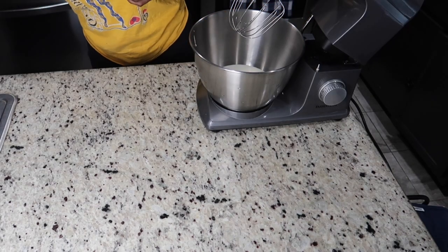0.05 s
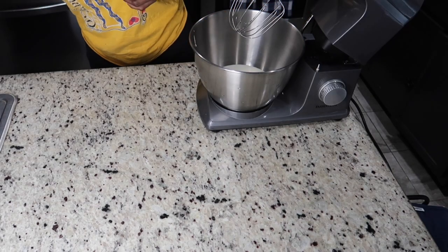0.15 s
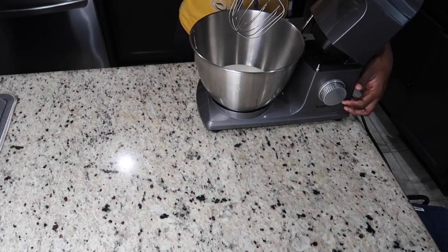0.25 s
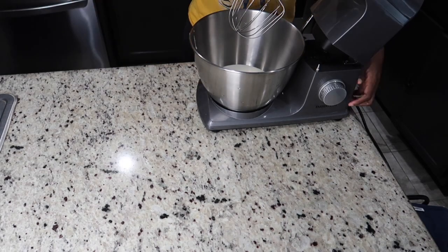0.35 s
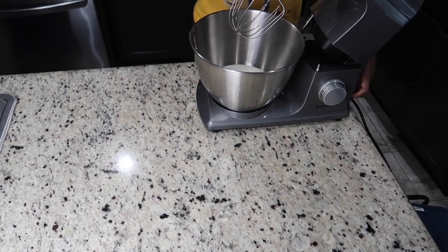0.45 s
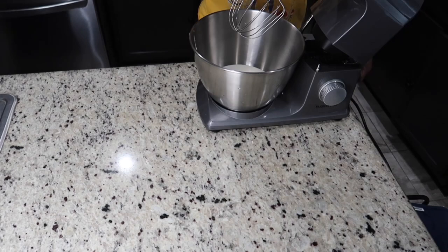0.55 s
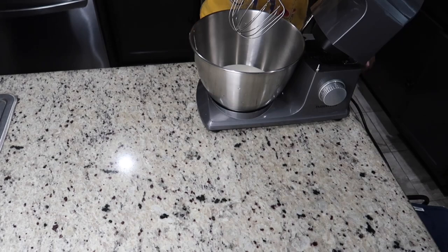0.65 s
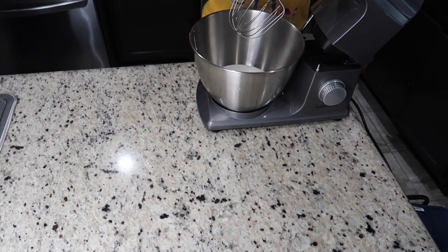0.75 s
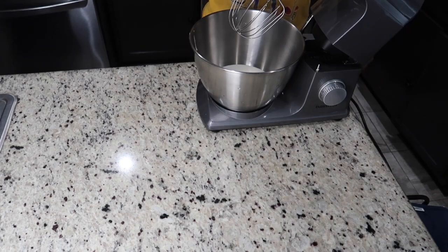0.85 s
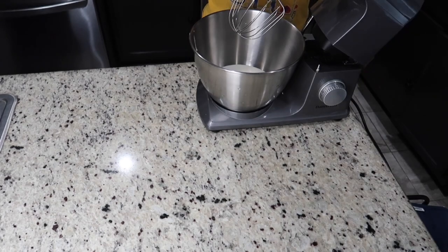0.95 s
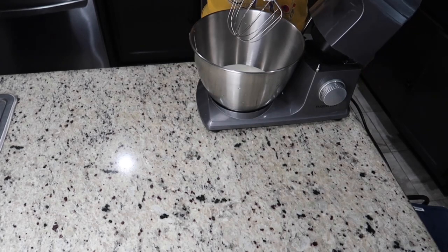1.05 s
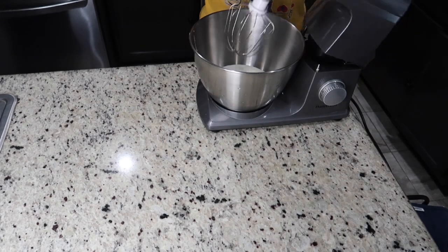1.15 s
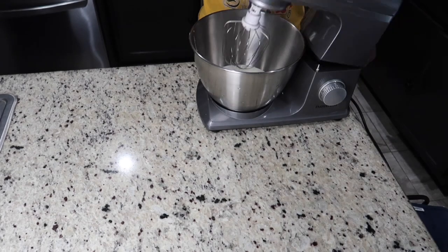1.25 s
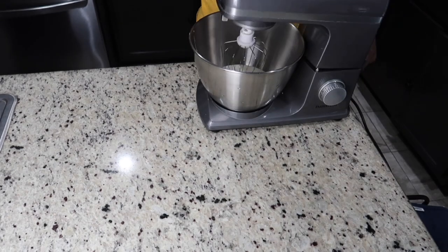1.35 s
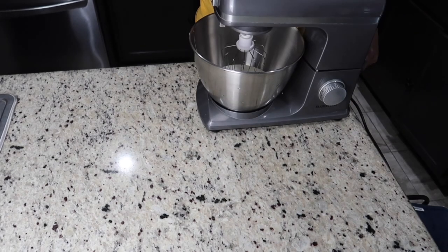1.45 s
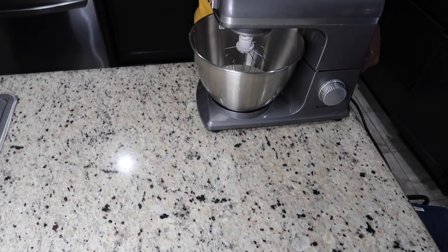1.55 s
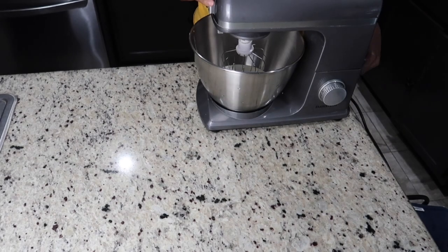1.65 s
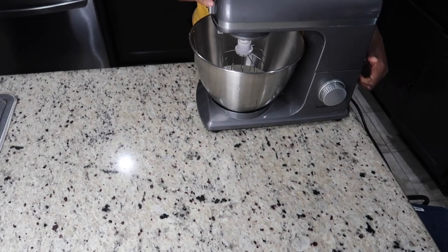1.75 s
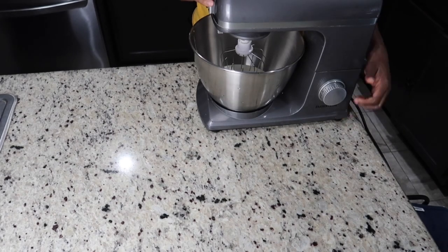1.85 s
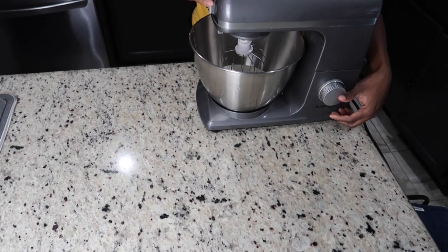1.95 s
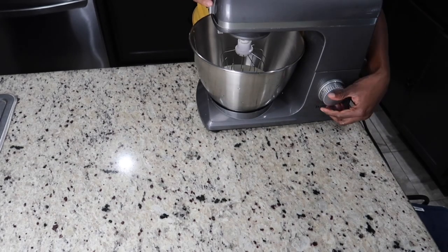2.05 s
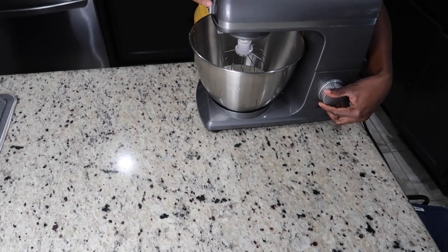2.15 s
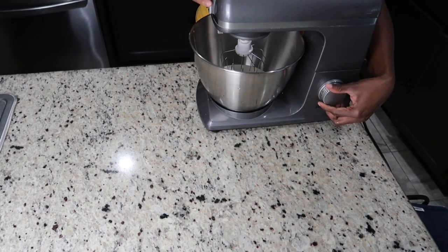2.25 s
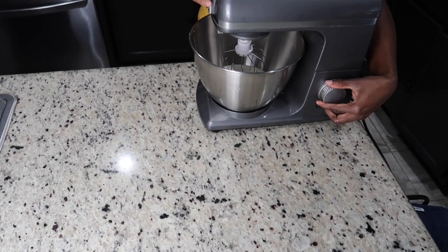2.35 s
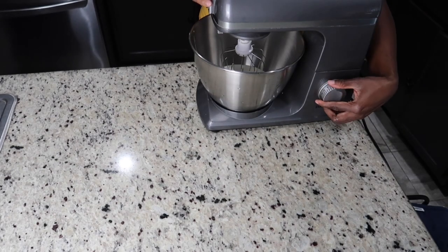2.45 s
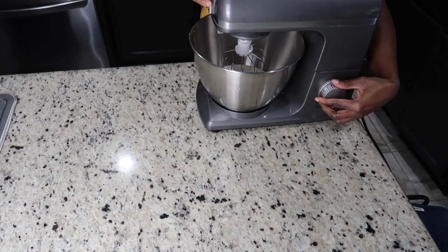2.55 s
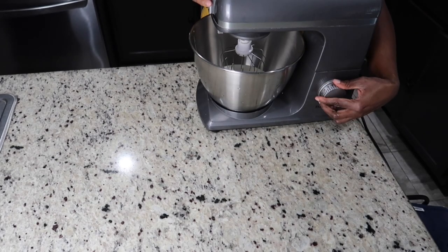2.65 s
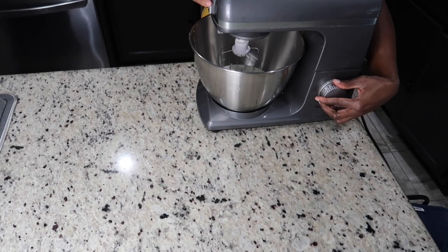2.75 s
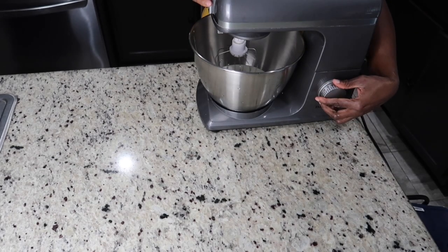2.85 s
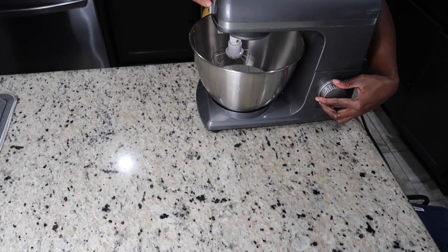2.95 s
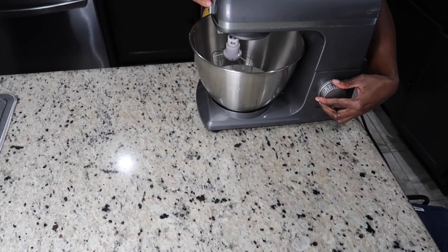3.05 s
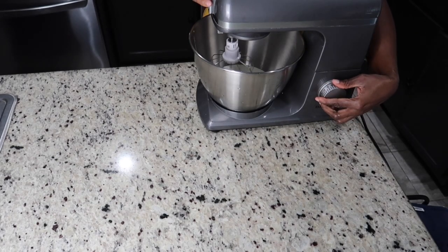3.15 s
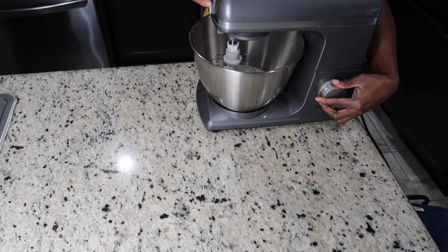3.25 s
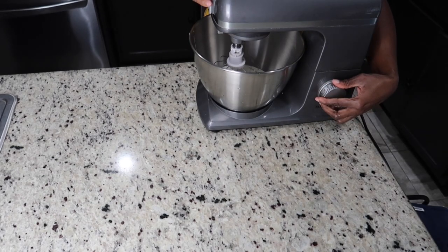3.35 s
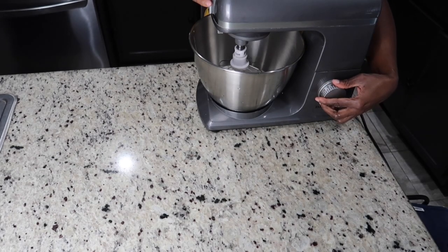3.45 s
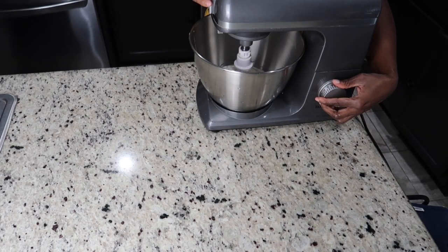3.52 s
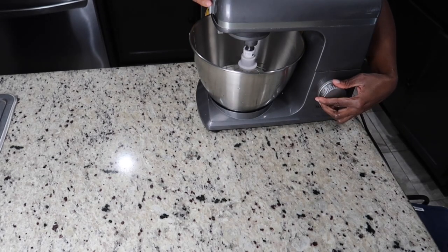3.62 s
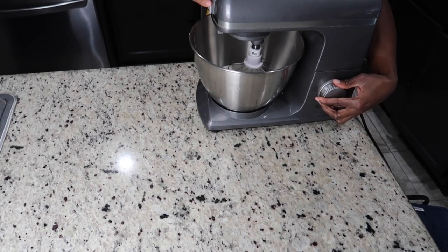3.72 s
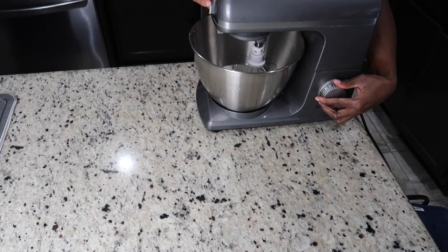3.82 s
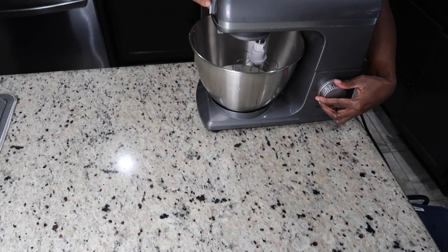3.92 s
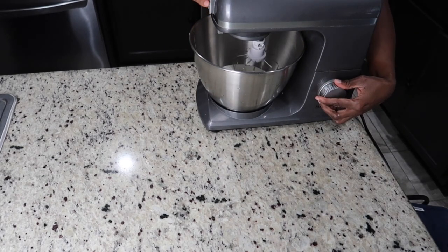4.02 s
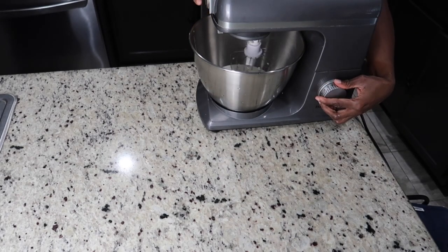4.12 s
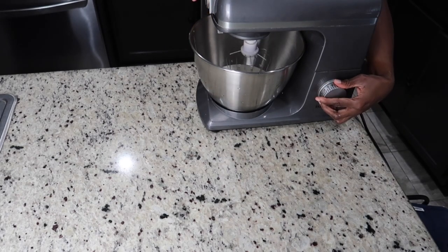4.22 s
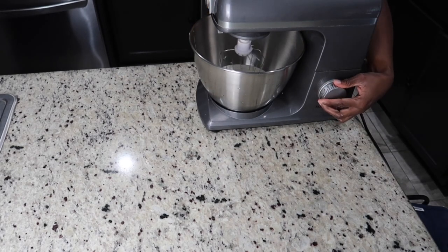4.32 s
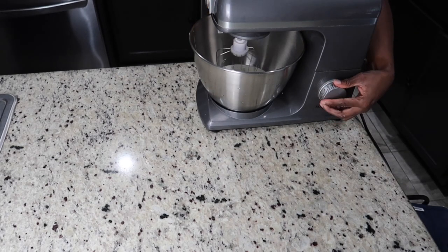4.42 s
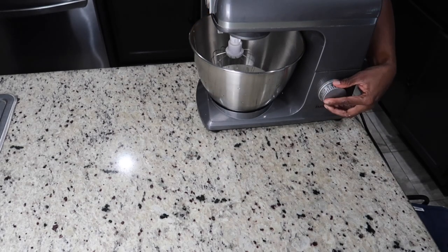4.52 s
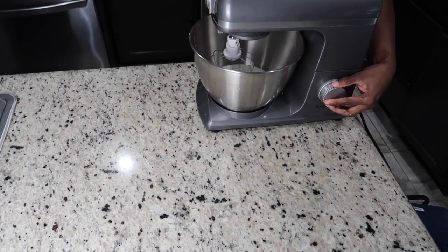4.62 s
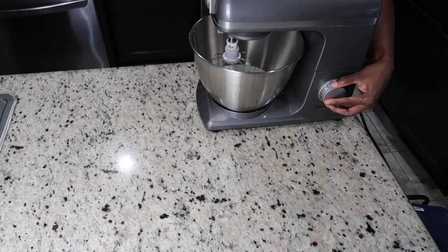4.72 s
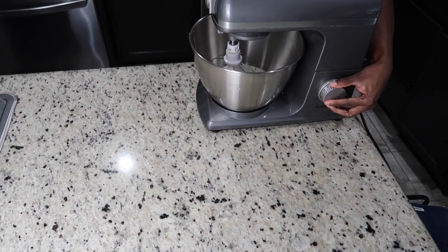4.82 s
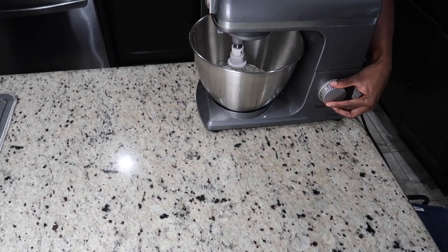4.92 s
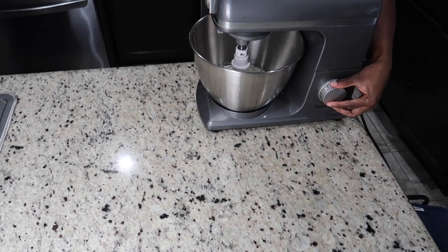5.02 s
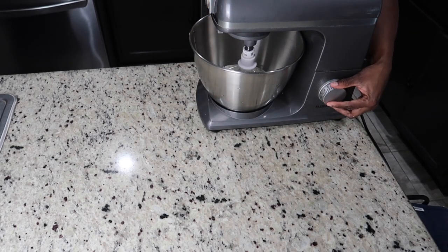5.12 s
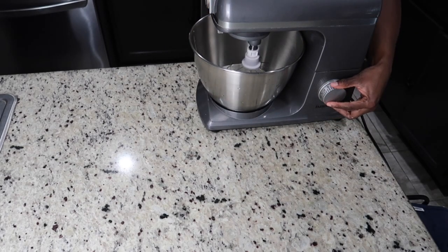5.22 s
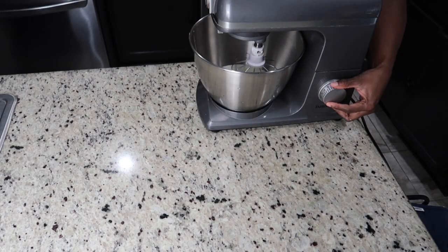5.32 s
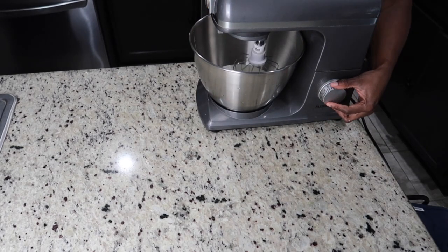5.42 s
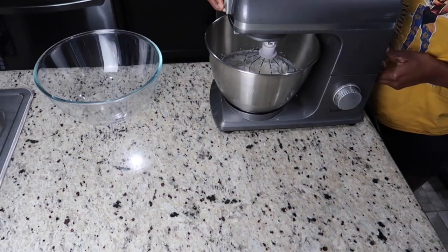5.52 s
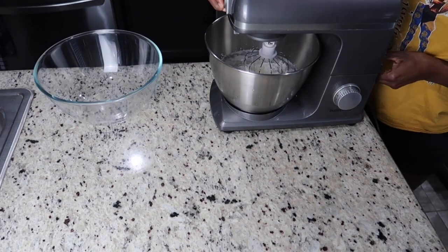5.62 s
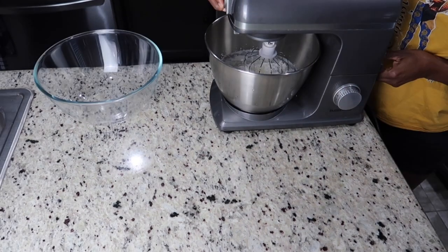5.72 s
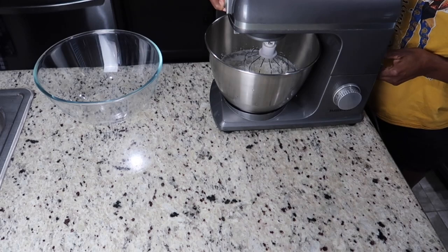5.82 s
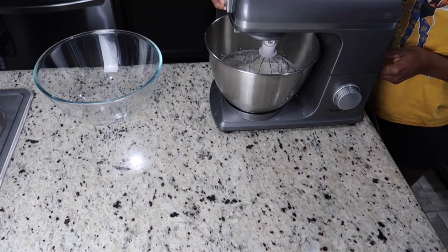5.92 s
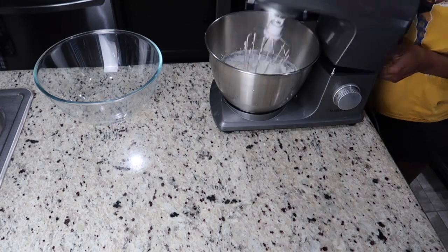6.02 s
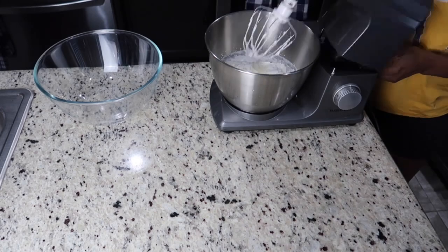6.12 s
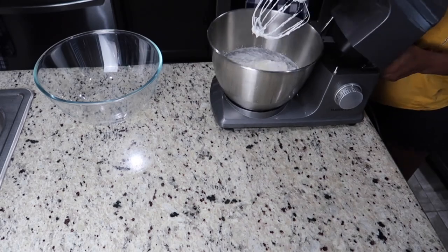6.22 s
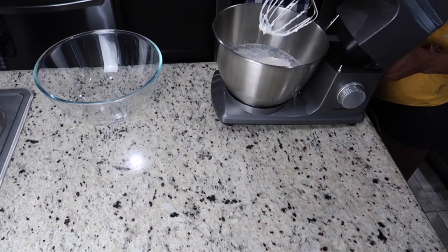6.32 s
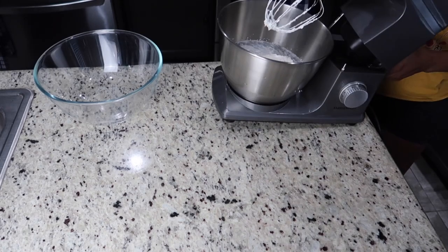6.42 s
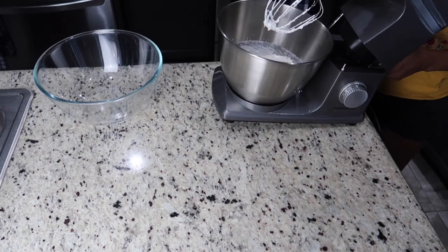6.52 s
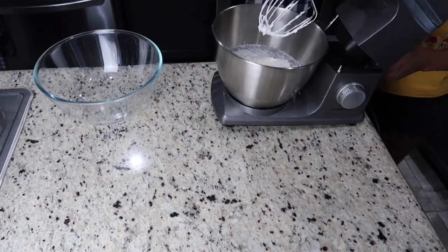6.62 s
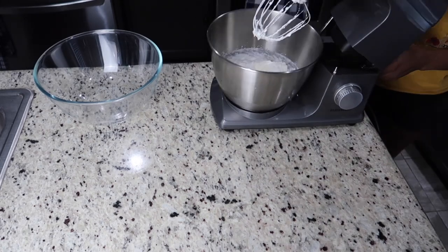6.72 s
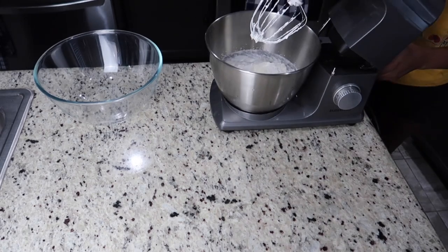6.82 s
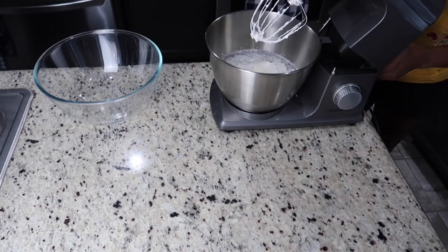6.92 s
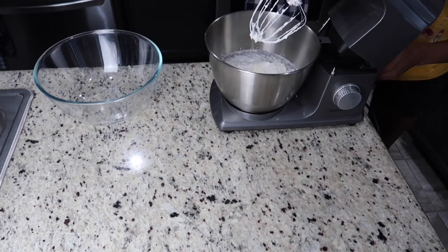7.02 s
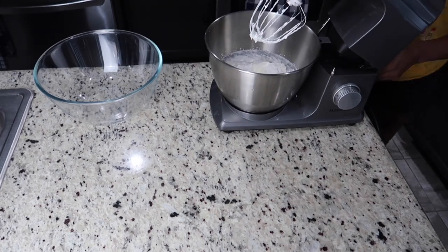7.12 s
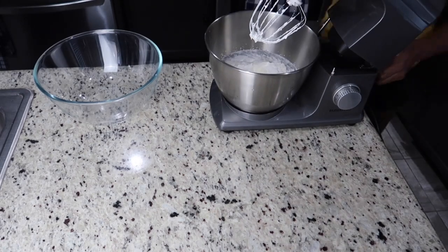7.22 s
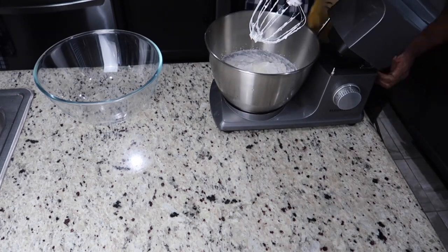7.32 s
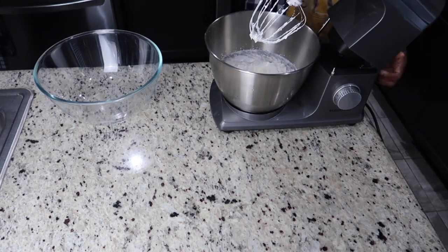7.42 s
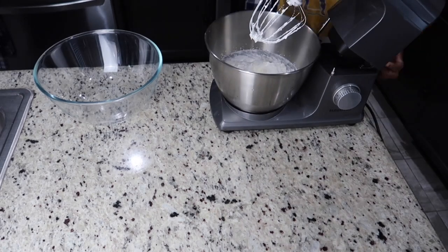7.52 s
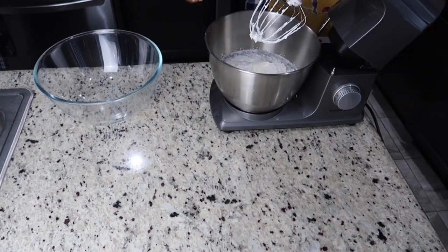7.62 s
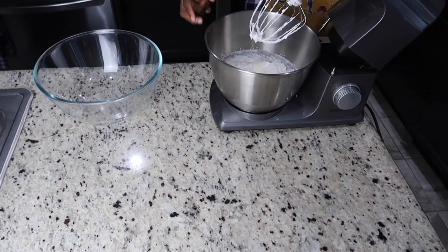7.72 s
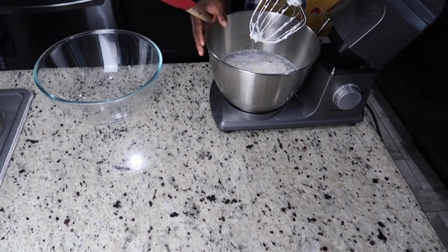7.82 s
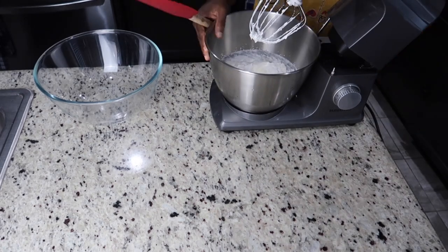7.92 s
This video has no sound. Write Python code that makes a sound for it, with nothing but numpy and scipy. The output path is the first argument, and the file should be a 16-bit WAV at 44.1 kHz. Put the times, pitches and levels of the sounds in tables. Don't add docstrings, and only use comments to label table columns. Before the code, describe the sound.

A close stereo pickup in a hard kitchen, with low appliance rumble and faint hiss. At 0.23 s a dull thud on stone, then a brief dip to silence at a scene change. A bright latch knock at 0.7 and very sharp steel clack at 0.98 ring briefly. Cloth and hands rub; from 1.2 the head swings down with a faint scrape and tiny squeal, a dull clack at 1.38, and a heavy landing at 1.72. A dial clicks at 2.5. From 2.64 the motor whirs up over about half a second, then holds a midrange gear whine with hum, brush noise and rattle, wavering slightly. It cuts off at 5.55. Latch clicks at 5.7, a hard knock at 5.95, a quick rising spring scrape at 6.13, a bang at 6.26, and a last ringing knock at 6.81. Light ticks and soft rubbing continue to 8.

```python
import sys
import numpy as np
from scipy import signal
from scipy.fft import rfft, irfft
from scipy.io import wavfile
from scipy.ndimage import uniform_filter1d

SR = 44100
rng = np.random.default_rng(int(sys.argv[2]) if len(sys.argv) > 2 else 0)


def ratio(d):
    e = np.asarray(d, float) / 20
    return 10 ** e


def materialize(psi):
    bounded = np.clip(np.atleast_2d(psi).T, -1, 1)
    quanta = np.round(bounded * 32767).astype(np.int16)
    wavfile.write(sys.argv[1], SR, quanta)


N = 351036
T = np.arange(N) / SR


def evened(x):
    return x / np.sqrt(np.mean(x ** 2) + 1e-20)


def read(points, hz):
    f, value = np.transpose(points)
    return np.interp(np.log(hz + 1), np.log(f + 1), value)


def peaked(hz, peaks):
    return sum(top / (1 + (2 * (hz - f) / width) ** 2) for f, width, top in peaks)


def drift(hz):
    return evened(signal.lfilter(*signal.butter(2, hz, fs=SR), rng.standard_normal(N)))


def band(x, lo_hz, hi_hz):
    return signal.sosfilt(signal.butter(2, [lo_hz, hi_hz], "band", fs=SR, output="sos"), x)


def resonate(x, hz, width):
    turn = np.exp(2j * np.pi * np.cumsum(hz * np.ones(len(x))) / SR)
    r = np.exp(-np.pi * width / SR)
    return 2 * (turn * signal.lfilter([1 - r], [1, -r], x / turn)).real


def noise(spectrum, peaks=(), patchy_db=1.5):
    hz = np.fft.rfftfreq(2048, 1 / SR)
    a, b, patches = rng.standard_normal((N // 512 + 5, 1025, 3)).T
    patches = uniform_filter1d(patches, size=12, axis=0)
    patches = evened(uniform_filter1d(patches, size=6, axis=1))
    db = read(spectrum, hz) + peaked(hz, peaks)
    frames = (a + 1j * b) * ratio(db[:, None] + patchy_db * patches)
    return evened(signal.istft(frames, nperseg=2048, noverlap=1536)[1][:N])


def contact(ms, spray):
    t = np.arange(len(spray)) / SR
    return spray * (1 - np.exp(-t / 0.0012)) * np.exp(-(1000 * t / ms) ** 1.35)


# frequency in Hz, level in dB per Hz.
RUMBLE = [(12, -32.5), (20, -2.5), (48, -16.5), (68, -31), (88, 9.5), (113, -1), (146, -9.5), (220, -11),
          (290, -42), (480, -120)]
HISS = [(88, -40), (150, -21.5), (274, -7.5), (308, -11), (346, -10.5), (453, -13.5), (500, -18),
        (751, -21.5), (10900, -48), (15500, -56.5)]


def air():
    duck_db, recover_s = 7.5, 0.68
    sunk = sum(ratio(db / 2) * np.exp(-abs(T - s) / recover_s) * np.clip((T - s) / 0.11, 0, 1)
               for s, db, *_ in KNOCKS)
    rumble = ratio(-44.5) * noise(RUMBLE, patchy_db=0.6)
    hiss = ratio(-51.5) * noise(HISS, patchy_db=2.0)
    return ratio(-duck_db * sunk) * (rumble + hiss)


# frequency in Hz, level in dB, t60 in seconds.
THUD_MODES = [(150, -5, 0.24), (216, 7.5, 0.066), (298, -1, 0.12), (378, -12, 0.24), (573, -8, 0.11),
              (930, -4.5, 0.031), (1400, -12, 0.045), (1800, -10.5, 0.054)]
# start in seconds, peak in dB.
THUD = [
    (.2302, -16.5),
]


def set_down():
    (s, peak_db), = THUD
    t = np.maximum(T - s, 0)
    rings = sum(ratio(db - 60 * t / t60) * np.sin(2 * np.pi * hz * t) for hz, db, t60 in THUD_MODES)
    rings *= 1 - np.exp(-t / 0.0013)
    return -ratio(peak_db) * rings / abs(rings).max()


# start in seconds, peak in dB, frequency in Hz, t60 in seconds.
THUMPS = [
    (.231, -18.5, 162, 0.11),
    (1.72, -22.5, 198, 0.15),
    (1.72, -28.5, 80.6, 0.28),
    (5.707, -38.5, 208, 0.14),
    (5.953, -26.5, 81, 0.31),
    (6.26, -22, 145, 0.2),
    (6.261, -32.5, 79, 0.22),
    (6.262, -18, 380, 0.093),
    (6.802, -16.5, 75, 0.064),
    (6.811, -22.5, 150, 0.18),
]
# start in seconds, peak in dB, frequency in Hz, t60 in seconds.
RINGS = [(0.7, -16, 1270, 0.094), (.7, -31.5, 1300, 0.52), (.698, -23, 3650, 0.13),
         (0.698, -23, 4550, 0.14), (0.698, -27.5, 5460, 0.2), (.99, -22, 1200, 0.06),
         (.982, -11, 2300, .03), (.987, -12.5, 2000, .03), (.9875, -9, 3500, 0.02),
         (.985, -10.5, 4930, 0.02), (.99, -34, 303, .4), (.99, -34, 490, 0.33), (2.12, -55, 3550, 0.027),
         (6.262, -22, 301, 0.24), (6.639, -43, 1400, 0.027), (6.815, -20, 1680, .08),
         (1.382, -16, 1400, 0.024), (1.385, -34, 1137, 0.26), (1.384, -19.5, 3700, 0.026),
         (1.384, -24.5, 3950, .05), (1.722, -14.5, 301, 0.16), (1.72, -25, 490, 0.3),
         (1.72, -20.5, 580, 0.073), (1.722, -29, 1100, .12), (1.7175, -6.5, 2000, 0.025),
         (1.72, -13.5, 2654, 0.05), (1.716, -34.5, 5460, 0.098), (2.507, -32.5, 3050, 0.026),
         (5.707, -32, 2600, 0.045), (5.707, -40, 4500, 0.074), (5.957, -20.5, 1100, 0.18),
         (5.957, -32, 5500, 0.14), (6.814, -6.5, 3870, 0.021), (6.815, -24.5, 4113, 0.14),
         (6.815, -26.5, 3246, .15), (6.814, -28, 1077, 0.3), (6.815, -20.5, 1400, 0.12),
         (5.956, -14, 2250, 0.037)]
# frequency in Hz, level in dB, t60 in seconds.
LATCH = [(7860, -5, 0.16), (9400, -8, 0.1), (10060, -2, 0.064), (10910, -13.5, 0.66), (11210, -28, 5.0),
         (11520, -29, 0.083), (12200, -12.5, .12), (12800, -11, 0.14), (14640, -14, .1)]
# start in seconds, level in dB.
LATCH_HITS = [
    (.697, -43.5),
    (5.707, -41.5),
    (5.78, -50),
    (5.958, -43.5),
]


def ringing():
    out = np.zeros(N)
    t = T[:SR // 2]
    chatter = drift(160)
    latch = [(s, hit + db, hz, min(t60, .15)) for s, hit in LATCH_HITS for hz, db, t60 in LATCH]
    for s, db, hz, t60 in THUMPS + RINGS + latch:
        start = round(s * SR)
        pair = np.sin(2 * np.pi * hz * t) + 0.38 * np.sin(2 * np.pi * 1.1 * hz * t)
        flutter_db = 3.5 * min(hz / 2500, 1) * chatter[start:][:len(t)]
        rise = 1 - np.exp(-t * hz / 0.22)
        out[start:][:len(t)] += ratio(db - 60 * t / t60 + flutter_db) * pair * rise
    return out


# start in seconds, peak in dB, body in dB, bright in dB, contact in ms.
KNOCKS = [
    (0.6961, -11, -21.5, 0, 13),
    (0.9814, -6, -24.5, -8.5, 4.8),
    (0.9853, -7.5, -22, -2, 4.2),
    (1.3816, -17, -14.5, -10, 3.4),
    (1.7174, -6.5, -13, -12, 6.3),
    (5.9545, -8, -14, -4.5, 8.3),
    (6.2585, -8, -17, -8.5, 3.5),
    (6.286, -17, -9, -10, 12),
    (6.813, -6.5, -24, -5, 4.9),
    (7.355, -56, 9, -17.5, 7.2),
]
# start in seconds, peak in dB, body in dB, bright in dB, contact in ms.
TOUCHES = [(.231, -42, 4, -8.5, 28), (0.68, -42.5, -16.5, -8, 4.5), (0.958, -43.5, -2.5, -4, 2.3),
           (1.682, -54.5, 8.5, -18, 24), (1.697, -49, 8, -19.5, 18), (1.712, -15, -12, -20, 2.4),
           (1.728, -16, -5.5, -10, 4), (5.952, -24.5, 2.5, -10, 2.2), (6.263, -10, -9, -14, 29),
           (6.27, -13.5, -8.5, -8, 2.2), (6.297, -20, -11.5, -6, 3.3), (6.808, -30, 8, -3, 6.8)]
# start in seconds, peak in dB, ring in Hz, bright in dB, contact in ms.
TICKS = [(0.5109, -43.5, 1420, -11.5, 6), (0.845, -21.5, 2300, -11.5, 9), (0.8761, -35, 1350, -13.5, 4),
         (1.2752, -33, 1210, -2, 6.8), (1.541, -47, 3800, -4.5, 4), (1.5664, -34.5, 3720, -12.5, 5),
         (2.5054, -32.5, 3140, -49, 2.7), (2.655, -31, 2600, -11.5, 4), (5.603, -23, 1124, -7.5, 2.9),
         (5.7045, -18, 2314, -1.5, 9.8), (5.7784, -27.5, 2660, 0.5, 6.3), (6.1344, -12.5, 3710, -9, 4),
         (6.147, -17.5, 1350, -24, 8), (6.1735, -24.5, 2220, -15, 4), (6.181, -20.5, 2650, -19.5, 4),
         (6.2235, -18.5, 2200, -14, 4), (6.6394, -44, 1400, -14, 6), (6.688, -38, 1100, -7, 9),
         (7.0556, -38, 3620, -18, 9.3), (7.3077, -43.5, 1194, -10, 6), (7.452, -44.5, 1130, -2, 12),
         (7.9362, -40.5, 2050, -3, 21)]
# frequency in Hz, level in dB, t60 in seconds.
CASTING = [(220, -1.5, 0.043), (300.7, -1.5, 0.15), (490, 2, 0.17), (617.4, -3.5, 0.13), (836, -24, 0.3),
           (1077.5, 2, 0.19), (1310, -1.5, 0.054), (1800, -10.5, 0.042), (2077, -5.5, 0.045),
           (2620, -17.5, .03), (3640, -4, 0.044), (4490, 3, 0.0093), (4650, -7.5, .03), (5460, -6, 0.095)]
# frequency in Hz, width in Hz, height in dB.
COLOUR_PEAKS = [(1160, 65, 6), (2250, 430, 6.5), (3690, 760, 4.5), (4570, 6700, 6.5)]
# low edge in Hz, high edge in Hz.
RANGES_HZ = ((150, 400), (400, 900), (900, 3000), (3000, 6000), (6000, 11500))


def in_ranges(x):
    return [band(band(x, *edges), *edges) for edges in RANGES_HZ]


def blows():
    crack, spread = np.zeros((2, N + 4000))
    rows = [(s, db, (body - 9, body, 0, bright, bright - 15), 0, ms)
            for s, db, body, bright, ms in KNOCKS + TOUCHES]
    rows += [(s, db, (-35, -30, 0, bright, bright - 22), hz, max(ms, 4.5))
             for s, db, hz, bright, ms in TICKS]
    colour_db = peaked(np.fft.rfftfreq(4000, 1 / SR), COLOUR_PEAKS)
    sprays = rng.standard_normal((len(rows), 4000))
    sprays *= ratio(2.77 * rng.exponential(1, (len(rows), 4000)))
    sprays = irfft(rfft(sprays) * ratio(colour_db))
    click = np.roll(irfft(ratio(.5 * colour_db)), 60)[:400]
    clicks = in_ranges(np.pad(click, (0, 3600)))
    for (s, db, ranges_db, hz, ms), spray in zip(rows, sprays):
        start = round(s * SR)
        hit = contact(ms, spray)
        parts = in_ranges(hit)
        if hz:
            parts[2] = parts[2] + 1.1 * resonate(hit, hz, 260)
        parts = [ratio(db + d) * p / abs(p).max() for p, d in zip(parts, ranges_db)]
        crack[start:][:4000] += sum(parts)
        spread[start:][:4000] += sum(c * np.linalg.norm(p) / np.linalg.norm(c)
                                     for c, p in zip(clicks, parts))
    crack, spread = crack[:N], spread[:N]
    ring = sum(ratio(db) * np.sqrt(t60 / 0.032) * resonate(crack, hz, np.log(9) / t60)
               for hz, db, t60 in CASTING)
    ring *= ratio(3.5)
    return crack + ring, spread + 0.45 * ring


# top in seconds, top in dB, rise in seconds, fall in seconds, resonance in Hz.
SLIDES = [(.44, -57.5, .06, 0.085, 2100), (.54, -52, 0.046, .2, 1590), (.685, -50, 0.097, .015, 1900),
          (.87, -47.5, 0.026, 0.17, 1540), (.96, -52.5, .03, .02, 1672), (1.23, -43, .07, 0.3, 1715),
          (1.35, -47, .08, .06, 2105), (1.5, -52.5, 0.025, 0.082, 1350), (1.7, -56, 0.18, .02, 1553),
          (2.48, -59.5, .06, .06, 2140), (2.55, -52, .04, .1, 2397), (2.632, -49, 0.035, 0.046, 2390),
          (5.59, -54.5, 0.052, .02, 1497), (5.8, -44, 0.022, 0.02, 1937), (5.942, -50.5, 0.2, .015, 2250),
          (6.69, -48, 0.072, 0.28, 1714), (6.78, -69, .1, 0.017, 1800), (7.12, -60.5, 0.052, 0.81, 1595),
          (7.315, -53, 0.017, 0.11, 1800), (7.465, -50, 0.041, 0.1, 2030), (7.73, -52, 0.024, 0.18, 2023),
          (7.95, -43, 0.19, .1, 1800)]
# frequency in Hz, level in dB per Hz.
SLIDE = [(180, -37), (300, -1), (870, -6), (1340, -4), (2340, -8.5), (2990, -11.5), (4830, -17.5),
         (12000, -42), (15600, -73), (22000, -120)]


def strokes():
    shapes = np.array([ratio(db - 12.5 * np.maximum((s - T) / rise, (T - s) / fall)) + 1e-9
                       for s, db, rise, fall, hz in SLIDES])
    return shapes.max(axis=0), np.transpose(SLIDES)[4] @ shapes / shapes.sum(axis=0)


def slides():
    level, hz = strokes()
    rub = noise(SLIDE, COLOUR_PEAKS, patchy_db=.8) * ratio(1.5 * drift(120))
    return level * evened(rub + 0.19 * resonate(rub, hz, 600))


# start in seconds, peak in dB, contact in ms.
SPARKS = [
    (.984, -34, 5.8),
    (1.7181, -36, 4),
    (2.506, -52, 3.3),
    (5.706, -39, 4),
    (5.955, -30.5, 6),
    (6.259, -36, 4),
    (6.814, -37.5, 4),
]


def sparks():
    out = np.zeros(N)
    for (s, db, ms), spray in zip(SPARKS, rng.standard_normal((len(SPARKS), 2000))):
        out[round(s * SR):][:2000] += ratio(db) * band(contact(ms, spray), 15000, 16000)
    return out


# start in seconds, length in seconds, level in dB, first Hz, last Hz.
SPRINGS = [
    (1.19, .14, -36, 2000, 1500),
    (1.297, .09, -47, 3000, 2500),
    (2.445, .06, -54, 2300, 2900),
    (6.133, .128, -23.5, 1400, 3900),
]


def springs():
    level, hz = np.zeros(N), np.full(N, 2000.)
    for s, length, db, first_hz, last_hz in SPRINGS:
        on = (T > s) & (T < s + length)
        u = (T[on] - s) / length
        level[on] = ratio(db - 11 * u) * np.minimum(.3 + 0.81 * u / 0.17, 1)
        hz[on] = first_hz + (last_hz - first_hz) * (u - 0.11 * np.sin(2 * np.pi * u))
    hz = hz * (1 + .05 * drift(60))
    slips = rng.standard_normal(N) * ratio(1.2 * drift(300))
    scrape = band(band(slips, 1050, 4200), 1050, 4200)
    ring = resonate(resonate(slips, hz, 640), hz, 640)
    return uniform_filter1d(level, size=200) * evened(.65 * scrape + 2.4 * ring)


# start in seconds, length in seconds, level in dB, first Hz, last Hz.
SQUEALS = [
    (1.298, .085, -44, 3900, 3700),
    (1.305, .08, -46, 2200, 2150),
]


def squeals():
    out = np.zeros(N)
    for s, length, db, first_hz, last_hz in SQUEALS:
        u = np.arange(round(length * SR)) / (length * SR)
        hz = first_hz + (last_hz - first_hz) * u
        ring = resonate(resonate(rng.standard_normal(len(u)), hz, 260), hz, 260)
        out[round(s * SR):][:len(u)] += ratio(db) * np.sin(np.pi * u) ** .4 * evened(ring)
    return out


# turns of the shaft, level in dB.
ORDERS_DB = [(6.1, -17), (9.65, -7.5), (12, -14.5), (21, -13.5), (22, 2), (23, -6), (24, -20), (32, -12.5),
             (33, -8.5), (34, -11.5), (55, -15.5), (64, -23.5)]


def gear_whine(turns, whine_hz):
    whine = sum(ratio(db + 2.74 * drift(16.5)) * np.cos(2 * np.pi * (k * turns + rng.random()))
                for k, db in ORDERS_DB)
    return whine * np.clip((whine_hz - 960) / 130, 0, 1) ** 2


# frequency in Hz, level in dB.
MAINS = [(240, -16), (360, -3), (480, -11), (600, -14), (1933, -9.5), (2040, -13), (2151, -14.5)]


def mains_hum(t, strain):
    hum = sum(ratio(db + 2.5 * drift(8)) * np.cos(2 * np.pi * (hz * T + rng.random())) for hz, db in MAINS)
    return hum * (1 - np.exp(-t / 0.12)) * ratio(-3 * strain)


# frequency in Hz, level in dB per Hz.
RATTLE = [(76, -55), (130, -24), (250, -21), (500, -12.5), (850, -16), (1300, -13), (2000, -15),
          (2500, -16), (3500, -19), (5000, -28.5), (7000, -39), (9000, -50.5), (11000, -65), (12500, -59),
          (15000, -62)]
# frequency in Hz, width in Hz, height in dB.
HOUSING = [(215, 15, 5), (280, 47, 9), (343, 19, -5), (396, 29, -0.5), (492, 30, 5), (567, 30, 6.5),
           (1128, 110, 12.5), (1694, 216, 11), (1963, 220, 5), (2250, 110, 7.5), (2740, 280, 8.5),
           (3195, 24, 7.5)]
# time in seconds, pitch in Hz.
HELD = [(3.2, 1096), (3.8, 1094), (3.9, 1107), (4.05, 1104), (4.22, 1095), (4.55, 1093), (4.74, 1097),
        (4.85, 1108), (5.0, 1101), (5.18, 1091), (5.3, 1100), (5.5, 1094)]


def motor():
    on_s, start_hz, climb_hz_per_s, teeth = 2.64, 619.8, 770, 22
    t = np.maximum(T - on_s, 0)
    held_hz = np.interp(T, *np.transpose(HELD))
    whine_hz = np.minimum(start_hz + climb_hz_per_s * t, held_hz)
    strain = uniform_filter1d(1. * (whine_hz < held_hz), size=round(0.4 * SR))
    turns = np.cumsum(whine_hz / teeth * (1 + 0.001 * drift(22))) / SR
    whine = 0.9 * ratio(-27) * gear_whine(turns, whine_hz)
    hum = 0.97 * ratio(-33) * mains_hum(t, strain)

    beat = 1 + 0.046 * np.cos(2 * np.pi * turns) + .08 * np.cos(2 * np.pi * 120 * T)
    rattle = noise(RATTLE, HOUSING, patchy_db=1.8) * beat
    brush = resonate(resonate(rattle, 2080, 300), 1830, 300) + 1.3 * resonate(rattle, 360, 180)
    brush = 0.21 * ratio(-34 + 17.5 * strain) * evened(brush)
    groan = ratio(-39.5) * strain * evened(resonate(resonate(rattle, 478.6, 23), 488, 21))
    build = 1 - np.exp(-(np.maximum(t - .05, 0) / 0.22) ** 0.91)
    chatter = (0.034 + 0.93 * build) * (3.055 * ratio(-38) * rattle + brush)
    running = np.clip(t / 0.0043, 0, 1) * (T < CUTS[1][0])
    return running * (whine + hum + groan + chatter)


# frequency in Hz, t60 in seconds.
KITCHEN = [(60, 0.1), (160, 0.58), (420, 0.61), (1100, 0.51), (2900, 0.36), (7700, 0.49), (15000, 0.19)]


def tail(x, start, scale):
    taps = np.zeros(SR // 2)
    at = np.arange(start, SR // 2 - 20, 20)
    taps[at + rng.integers(0, 20, len(at))] = rng.choice([-1., 1.], len(at))
    hz, t, z = signal.stft(taps, SR, nperseg=256)
    decay = ratio(-60 * t / (scale * read(KITCHEN, hz)[:, None]))
    taps = signal.istft(z * decay, SR, nperseg=256)[1]
    return signal.fftconvolve(x, taps / np.linalg.norm(taps))[:N]


def scene():
    direct, spread = blows()
    other = set_down() + ringing() + springs() + sparks() + squeals()
    kitchen = ratio(-6.5) * tail(spread + 0.35 * other, 300, 0.94)
    near = direct + other + kitchen + slides() + motor() + air()
    near = near + ratio(-22.0) * tail(spread, 1500, 2.0)
    return np.array([near, tail(near, 4, .7) + 3.6 * air()])


# frequency in Hz, level in dB.
PORTS = [(60, -37.5), (120, -27), (240, -16.5), (480, -22.5), (950, -24), (1890, -17.5), (3770, -11.5),
         (7520, 1.5), (11000, 5), (15000, 10)]


def port_difference(dry):
    hz = np.fft.rfftfreq(N, 1 / SR)
    return irfft(ratio(read(PORTS, hz)) * ((-.03 - .75j) * rfft(dry[0]) + 0.53 * rfft(dry[1])), N)


# time in seconds, fade out in seconds, fade in in seconds.
CUTS = [
    (.286, 0.027, 0.055),
    (5.552, 0.034, 0.018),
]


def cut_fades():
    return np.prod([np.clip(np.maximum((s - T) / out, (T - s) / back), 0, 1) for s, out, back in CUTS], axis=0)


def roll_off(x):
    return signal.sosfilt(signal.butter(12, 16000, fs=SR, output="sos"), x)


def record(dry):
    side = port_difference(dry)
    hiss = ratio(-73) * band(rng.standard_normal(N), 10000, 15000)
    x = cut_fades() * np.array([dry[0] + side + hiss, dry[0] - side - .3 * hiss])
    x = signal.sosfilt(signal.butter(4, 40, "high", fs=SR, output="sos"), x)
    x = .93 * np.tanh(1.17 * x) * ratio([[-.25], [.25]])
    x = signal.sosfilt(signal.cheby2(10, 60, 16500, fs=SR, output="sos"), x)
    return roll_off(x)


dry = scene()
out = record(dry)
materialize(out)
```